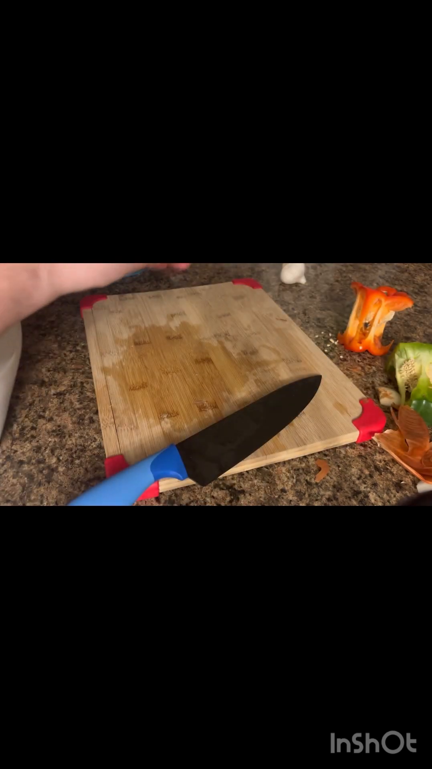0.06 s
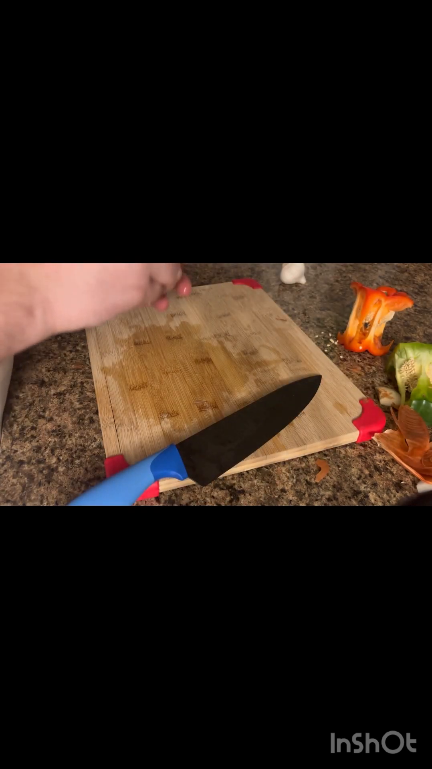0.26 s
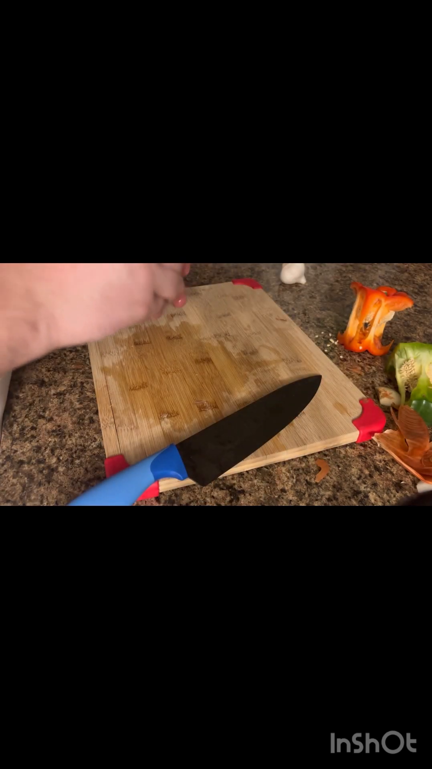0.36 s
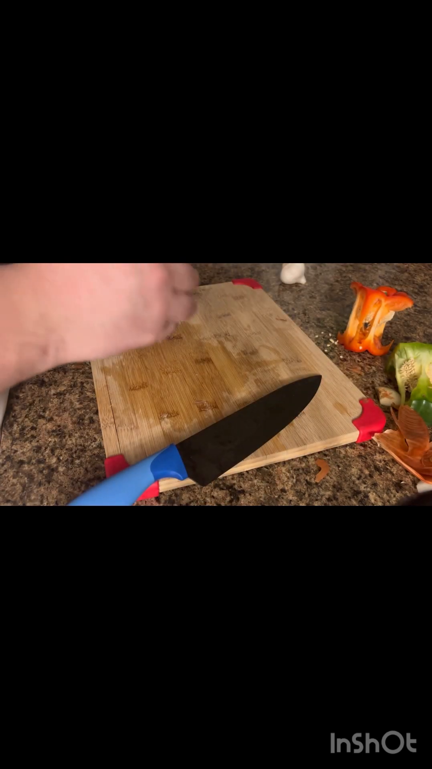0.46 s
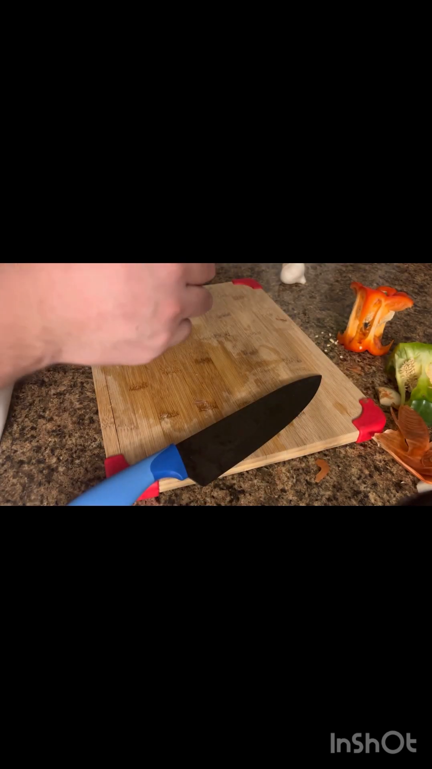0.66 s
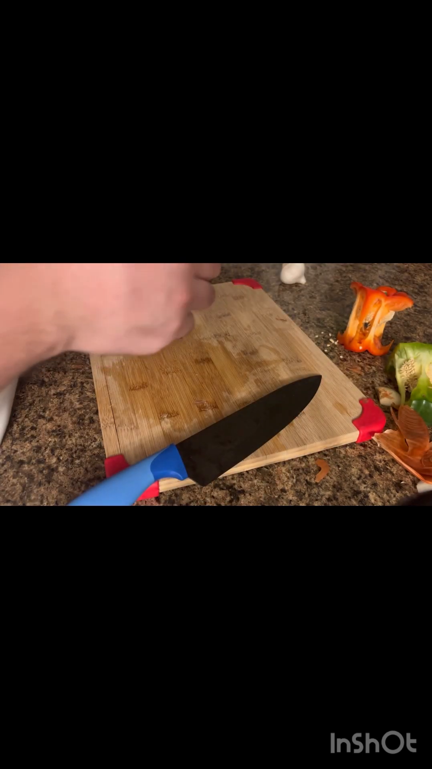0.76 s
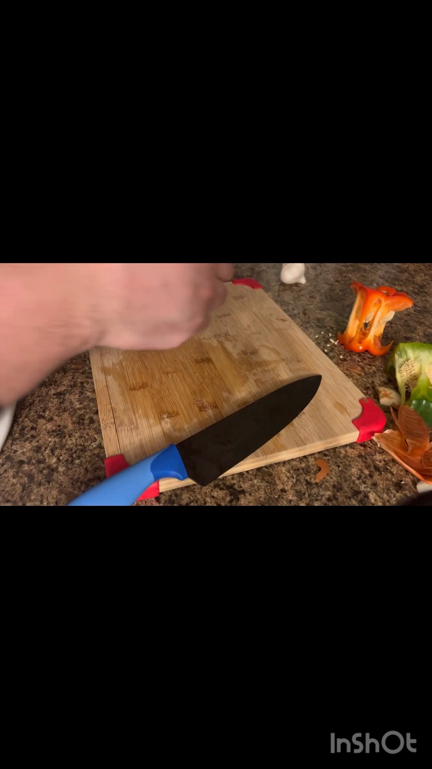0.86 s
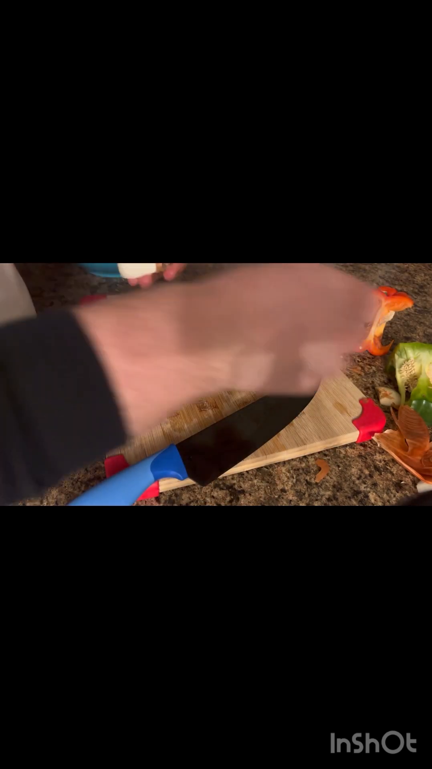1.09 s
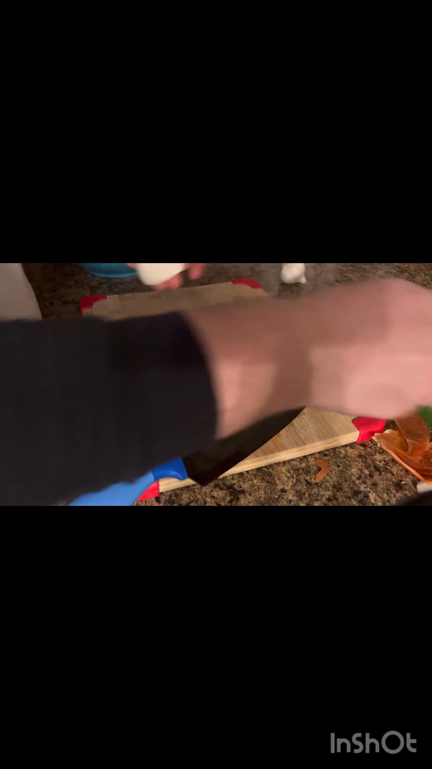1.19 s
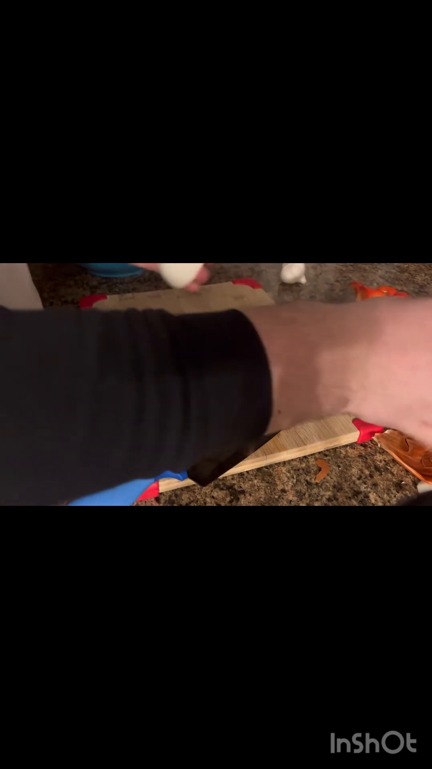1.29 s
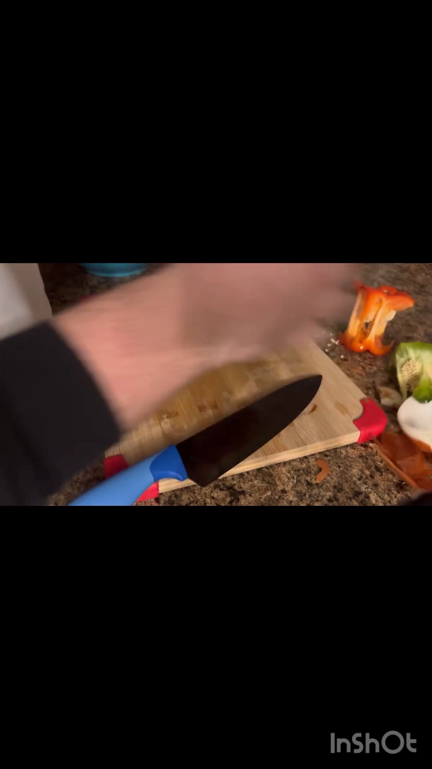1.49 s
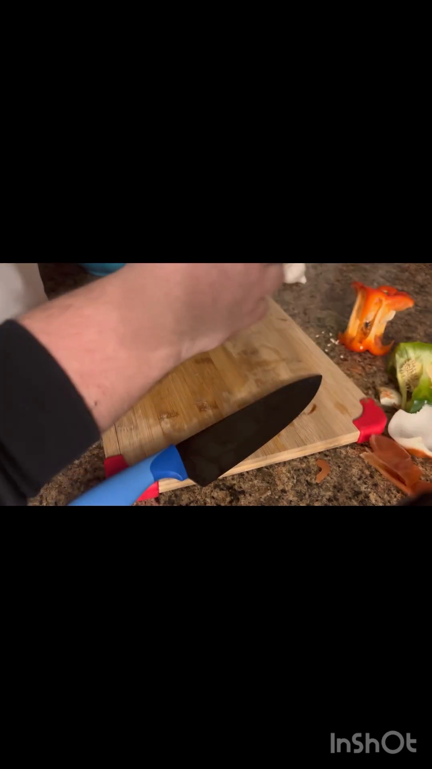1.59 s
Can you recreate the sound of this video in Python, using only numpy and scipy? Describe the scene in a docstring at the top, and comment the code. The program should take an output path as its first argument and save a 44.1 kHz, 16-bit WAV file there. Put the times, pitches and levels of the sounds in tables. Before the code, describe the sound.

Dry onion peel snaps in hands over a wooden board, with taps and a short bowl clatter near the start, a small rip midway, then low thuds; close stereo pickup, short room tail, faint hum.

```python
"""Dry onion skin crackles and tears as hands work it over a wooden cutting board in a small kitchen.
Sharp taps, then a hollow bump and a rattle, as of a bowl; soft knocks on the board; a low hum under all.
Skin is noise bursts and random grains; the bowl and knocks are decaying sines; taps are shaped clicks.
Reflections and a short tail follow, and two close microphone ports differ in phase and level."""
import sys
import numpy as np
from scipy import signal
from scipy.fft import rfft, irfft, next_fast_len
from scipy.io import wavfile

SR = 44100
rng = np.random.default_rng(int(sys.argv[2]) if len(sys.argv) > 2 else 0)


def unload_wav(signal):
    """Save mono or channel-first audio to the path in sys.argv[1] as 16-bit WAV at rate SR, clipped to [-1, 1]."""
    wavfile.write(
        sys.argv[1],
        SR,
        np.round(np.clip(np.atleast_2d(signal).T, -1, 1) * 32767).astype(np.int16),
    )


N = 72765
T = np.arange(N) / SR
SIZE = 2 * next_fast_len(N)  # padded transform length
HZ = np.fft.rfftfreq(SIZE, 1 / SR)
SAMPLES_PER_MS = SR / 1000


def amp(db):
    """Decibels to gain."""
    return 10 ** (np.asarray(db) / 20)


def unit(x):
    """Divide by the root of the mean square: rms 1 for real x."""
    return x / np.sqrt(np.mean(x ** 2) + 1e-20)


def along(points, hz=HZ):
    """Interpolate (Hz, value) points on a log frequency axis."""
    f, v = np.transpose(points)
    return np.interp(np.log(hz + 1), np.log(f + 1), v)


def filtered(x, response):
    """x through a frequency response."""
    return irfft(rfft(x, SIZE) * response, SIZE)[..., :N]


def colour(points):
    """Minimum-phase response shaped by (Hz, dB) points, then normalised by unit()."""
    cepstrum = irfft(np.log(amp(along(points))))
    cepstrum[1:SIZE // 2] *= 2
    cepstrum[SIZE // 2 + 1:] = 0
    return unit(np.exp(rfft(cepstrum)))


def decay(t, t60):
    """Exponential decay, 60 dB down at t60."""
    return np.exp(-np.log(1000) * t / t60)


def fade(start_s, t60):
    """Envelope that starts at start_s and decays."""
    return (T >= start_s) * decay(np.maximum(T - start_s, 0), t60)


def clicks(rows, t60, rough):
    """A sharp pulse trailed by a noise burst per (s, dB over 1 ms); rough is the burst's energy share."""
    out, t = np.zeros(N + SR), np.arange(SR // 20) / SR
    rough = np.clip(rough, 0, 1)
    for s, db in rows:
        burst = rng.standard_normal(len(t)) * decay(t, t60)
        burst *= np.sqrt(rough) / np.linalg.norm(burst)
        burst[0] = np.sqrt(1 - rough)
        out[round(s * SR):][:len(t)] += amp(db) * burst * np.sqrt(SAMPLES_PER_MS)
    return out[:N]


def grains(per_s, spread_db):
    """Tiny fractures at random moments, of random sign and uneven size, rms 1."""
    hits = rng.random(N) < per_s / SR
    signs = rng.choice([-1, 1], N)
    sizes = amp(spread_db * np.minimum(rng.exponential(size=N), 3))
    return unit(hits * signs * sizes)


def skin(snap_db=1, rustle_db=-1, flutter_t60_s=0.0029, split_hz=6500):
    """Single snaps, short rips and a fine crackle of fractures, all in the skin's papery colour."""
    # snaps: (time [s], rel. level [dB], treble over low band [dB])
    snap_rows = [(0.0579, -46, 1.5), (0.0834, -42.5, 18), (.105, -48, 20), (0.1186, -42.5, 0),
                 (0.126, -47, -11), (.1651, -46, 9), (.268, -57, 6), (0.2893, -34, 4), (.3134, -22.5, 7),
                 (.3201, -37, -16), (0.3311, -30.5, 17), (0.339, -34, 7), (.3765, -31, 0.5),
                 (0.4593, -50, -3), (.4781, -40, -1), (.5309, -49, 9), (0.5427, -38, 14), (.6528, -43, 16),
                 (0.6625, -44.5, 23), (.7303, -42.5, -1), (0.739, -40, 7), (.7416, -29, 18),
                 (0.7536, -31.5, 9), (.7743, -57, 4), (0.7893, -54, 13), (0.7962, -33.5, 18),
                 (0.8696, -38, 28), (0.8782, -41, 0), (.8875, -35, 1), (0.9041, -39.5, -2),
                 (0.9172, -37, 5), (.9702, -34.5, -10), (1.0898, -46, 10), (1.0974, -35.5, 10.5),
                 (1.1219, -44, 18), (1.127, -37.5, 26), (1.1633, -37, -4), (1.1787, -41, 2),
                 (1.1992, -47, 2), (1.2986, -42, 1), (1.3028, -40, 1), (1.3303, -40, -14),
                 (1.3473, -37.5, 1), (1.3788, -44, -18), (1.3962, -38, -3), (1.406, -42, -10.5)]
    # rips: (start [s], rel. level [dB], t60 [s])
    rip_rows = [(0.9522, -32.5, 0.035), (0.958, -27.5, .045), (.9645, -32.5, 0.022), (1.328, -42, .12)]
    # fine crackle: (time [s], rel. level [dB])
    rustle_levels = [(0, -70), (.05, -59.5), (.12, -55), (.25, -51.5), (.29, -45.5), (.38, -42), (.40, -64),
                     (.45, -55), (.53, -51.5), (.6, -70), (.66, -55), (.72, -61.5), (.76, -51),
                     (.85, -56.5), (.885, -44), (.94, -64), (1.06, -67), (1.15, -65), (1.175, -45),
                     (1.23, -66), (1.29, -85), (1.35, -64), (1.41, -50), (1.46, -62), (1.55, -56.5),
                     (1.6, -78)]
    # papery spectrum: (frequency [Hz], rel. level [dB])
    skin_colour = [(100, -9.5), (500, -12.5), (900, -4.5), (2000, -3.5), (3500, -2.5), (5500, -4.5),
                   (7500, 2), (9500, 1.5), (12500, -2.5), (14500, -2), (16000, -2.5)]

    # the tilt splits each snap's energy between two bands
    treble = 1 / (1 + (split_hz / np.maximum(HZ, 1)) ** 4)
    dull_rows = [(s, db - 10 * np.log10(1 + amp(2 * tilt))) for s, db, tilt in snap_rows]
    bright_rows = [(s, db - 10 * np.log10(1 + amp(-2 * tilt))) for s, db, tilt in snap_rows]
    dull = filtered(clicks(dull_rows, t60=0.013, rough=0.99), unit(1 - treble))
    bright = filtered(clicks(bright_rows, t60=0.007, rough=0.79), unit(treble))
    snaps = amp(snap_db) * (dull + bright)

    flake = rng.standard_normal(N) * fade(0, flutter_t60_s)
    fractures = grains(per_s=650, spread_db=4)
    crackle = unit(signal.fftconvolve(fractures, flake[:SR // 20])[:N])
    rustle = crackle * amp(rustle_db + np.interp(T, *np.transpose(rustle_levels)))

    rip_envelope = sum(amp(db) * fade(s, t60) for s, db, t60 in rip_rows)
    rips = grains(per_s=3000, spread_db=2.5) * rip_envelope
    return filtered(snaps + rustle + rips, colour(skin_colour))


def bowl(rattle_db=2, ring_t60_s=0.012, crack_db=-7, crack_t60_s=0.011, rise_s=0.00042):
    """Each hard contact rings briefly at its own pitch and in the bowl's high modes; rubbing fills the gaps."""
    # hard contacts: (time [s], rel. level [dB], main ring [Hz])
    rattle_rows = [(0.2851, -29, 1990), (0.293, -41.5, 2060), (.3035, -26.5, 2120), (0.307, -31, 2180),
                   (0.3104, -25.5, 2093), (.3195, -32, 2180), (.3321, -35.5, 2100), (.3483, -44, 2180),
                   (0.3589, -29.5, 2000), (.3657, -30.5, 2400), (0.371, -34, 2390), (.376, -36, 2300),
                   (.382, -50, 2480), (0.4174, -34, 2200), (.427, -37, 2360), (0.4338, -32.5, 2480),
                   (0.4408, -39, 2500), (0.446, -32, 2280), (.4868, -55, 2500), (0.4941, -40, 2550),
                   (0.5032, -35.5, 2500), (0.51, -48, 2430), (0.556, -41.5, 2350)]
    # high modes: (frequency [Hz], mean level re main ring [dB], t60 [s])
    high_modes = [(2920, -18, 0.0067), (3180, -13.5, 0.0069), (3900, -11, 0.0039), (4060, -10, 0.0064),
                  (4600, -30, 0.004), (7110, -5.5, 0.0083)]
    # rubbing on the bowl: (time [s], rel. level [dB])
    scrape_levels = [(.27, -73), (.305, -46), (.37, -44), (.40, -56.5), (.435, -46.5), (.5, -49.5),
                     (.58, -60.5), (.62, -94)]
    # rubbing spectrum: (frequency [Hz], rel. level [dB])
    rubbing_colour = [(300, 0.5), (1000, -32.5), (1550, -2), (1900, 4), (2450, -8.5), (2900, -4),
                      (3700, -8), (5000, -8), (8000, -10.5), (16000, -10.5)]

    out, t = np.zeros(N + SR), np.arange(SR // 20) / SR
    for s, db, hz in rattle_rows:
        ring = np.sin(2 * np.pi * hz * t) * decay(t, ring_t60_s)
        ring += amp(crack_db) * rng.standard_normal(len(t)) * decay(t, crack_t60_s)
        for mode_hz, level_db, t60 in high_modes:
            gain = amp(level_db + 2 * rng.standard_normal())
            ring += gain * np.sin(2 * np.pi * (mode_hz * t + rng.random())) * decay(t, t60)
        ring *= 1 - np.exp(-t / rise_s)
        ring /= np.linalg.norm(ring)
        out[round(s * SR):][:len(t)] += amp(db + rattle_db) * ring * np.sqrt(SAMPLES_PER_MS)
    rubbing = grains(per_s=700, spread_db=4.5) * amp(np.interp(T, *np.transpose(scrape_levels)))
    return out[:N] + filtered(rubbing, colour(rubbing_colour))


def bump(start_s=0.266, rise_s=0.008, level_db=-24.5):
    """A soft bump sets the bowl's low modes humming."""
    # low modes: (frequency [Hz], rel. level [dB], t60 [s])
    low_modes = [(150.9, -0.5, 0.34), (156.9, -1.5, 0.63), (221, -8.5, 0.41)]
    age = np.maximum(T - start_s, 0)
    hum = sum(amp(db) * fade(start_s, t60) * np.sin(2 * np.pi * hz * age) for hz, db, t60 in low_modes)
    return amp(level_db) * hum * (1 - np.exp(-age / rise_s))


def taps(wood_db=3, ring_db=-3, crack_db=-2):
    """Taps of onion and fingers: a dry crack and a brief ring, with a short wooden knock under them."""
    # taps: (time [s], rel. level [dB], knock offset before wood_db [dB])
    tap_rows = [(.198, -54, 5), (0.2005, -44.5, -4.5), (0.2062, -49, 2.5), (0.2151, -50, 6.5),
                (.225, -30.5, -34), (0.224, -30.5, -30), (.2267, -32, -16), (0.2307, -44, -9),
                (0.2342, -40.5, -7.5), (0.2478, -60, 7), (.253, -55.5, 2), (0.257, -46.5, 9.5),
                (0.264, -52.5, 15), (.359, -45, 1), (0.4873, -41, -1), (1.6275, -53, 7)]
    # ring of a hard tap: (frequency [Hz], rel. level [dB], t60 [s])
    ring_modes = [(2368, -4.5, 0.0084), (2690, -6, 0.0067), (3400, 5, 0.0062)]
    # crack spectrum: (frequency [Hz], rel. level [dB])
    crack_colour = [(100, -40), (700, -30), (1500, -3.5), (2500, 3.5), (3700, 16), (4600, 7), (7500, 10),
                    (10500, -2), (13500, 5.5), (16000, -9.5)]
    # wooden knock spectrum: (frequency [Hz], rel. level [dB])
    wood_colour = [(60, -3.5), (200, -0.5), (300, -2), (480, -7), (750, -4.5), (1100, -20.5), (3000, -36.5),
                   (16000, -70)]

    crack = clicks([(s, db) for s, db, low_db in tap_rows], t60=0.008, rough=0.6)
    knock = clicks([(s, db + low_db) for s, db, low_db in tap_rows], t60=0.025, rough=0.6)
    ring = sum(amp(db) * fade(0, t60) * np.sin(2 * np.pi * hz * T) for hz, db, t60 in ring_modes)
    body = amp(crack_db) * colour(crack_colour) + amp(ring_db) * unit(rfft(ring, SIZE))
    return filtered(crack, body) + amp(wood_db) * filtered(knock, colour(wood_colour))


def board(rise_s=0.0046, sag_share=1.76, sag_s=0.0052):
    """Soft knocks start sag_share above their final pitch and sink as the contact relaxes."""
    # knocks: (time [s], level [dB], final pitch [Hz], t60 [s])
    knock_rows = [(0.272, -24.5, 63, 0.12), (0.682, -35.5, 88.7, 0.36), (1.3032, -17, 97, 0.06),
                  (1.346, -25.5, 98, 0.055), (1.55, -39, 114, 0.33)]
    out = np.zeros(N)
    for s, db, hz, t60 in knock_rows:
        age = np.maximum(T - s, 0)
        turns = hz * (age + sag_share * sag_s * (1 - np.exp(-age / sag_s)))
        rise = 1 - np.exp(-(age / rise_s) ** 2)
        out -= amp(db) * fade(s, t60) * rise * np.sin(2 * np.pi * turns)
    return out


def counter(x, t60_s=0.015):
    """Early reflections from board, counter and hands: decaying noise, independent at each port."""
    echoes = (rng.standard_normal((2, N)) * fade(0.00075, t60_s))[:, :SR // 10]
    return signal.fftconvolve(x[None], echoes / np.linalg.norm(echoes[0]), axes=1)[:, :N]


def kitchen(x, apart=0.4):
    """The room's tail: noise decaying by frequency, mostly shared; apart is the gain of each port's own part."""
    # room decay: (frequency [Hz], t60 [s])
    room_t60 = [(150, 0.9), (1000, 0.29), (4000, 0.31), (14000, 0.27)]
    hz, t, spectra = signal.stft(rng.standard_normal((3, SR // 2)), SR, nperseg=256)
    parts = signal.istft(spectra * decay(t, along(room_t60, hz)[:, None]), SR, nperseg=256)[1]
    tail = parts[0] + apart * parts[1:]
    tail = np.pad(tail / np.linalg.norm(tail[0]), ((0, 0), (SR // 300, 0)))  # delayed by 1/300 s
    return signal.fftconvolve(x[None], tail, axes=1)[:, :N]


def background(air_db=-47.5, hum_hz=59.43, hum_db=-53):
    """Room air as partly correlated stereo noise, and an appliance's hum as a steady sine."""
    # air spectrum: (frequency [Hz], rel. level [dB])
    air_colour = [(25, -25), (45, -13.5), (65, -5), (110, -0.5), (160, -17), (220, -5.5), (320, -14.5),
                  (550, -12), (900, -17.5), (2000, -22.5), (4000, -30.5), (7000, -44), (10000, -83.5),
                  (16000, -52)]
    # left-right likeness of the air: (frequency [Hz], correlation [-1..1])
    air_alike = [(100, 0.99), (250, 0.77), (600, -0.4), (1300, -0.4), (2800, 0.38), (7000, -0.25)]
    turn = np.arccos(np.clip(along(air_alike), -1, 1)) / 2
    mid_side = amp(along(air_colour)) * np.array([np.cos(turn), np.sin(turn)])
    mid, side = filtered(rng.standard_normal((2, N)), mid_side)
    air = unit(np.array([mid + side, mid - side]))
    hum = unit(np.sin(2 * np.pi * hum_hz * T))
    return amp(air_db) * air + amp(hum_db) * hum


def scene(room_db=-8, early_db=-11, thud_room_db=-22):
    """All sources with reflections, reaching the ports with a difference of phase and level."""
    # port phase: (frequency [Hz], left lead [rad])
    port_phase = [(100, 0), (1100, .6), (1550, 1.8), (1850, .3), (2700, 1.2), (3900, .4), (4700, .3),
                  (6400, -1.3), (7500, -2.3), (8100, -3), (9000, -3.3), (9700, -4.1), (11000, -6),
                  (13300, -6.5), (14200, -7.6), (15000, -8.9), (15800, -9.4)]
    # port level: (frequency [Hz], left over right [dB]); the background gets half
    port_tilt = [(150, 0), (500, 6.5), (1400, 0), (2400, 3.5), (4000, 9.5), (7000, 0.5), (10000, 1)]

    crisp = skin() + bowl() + taps()
    thuds = board() + bump()
    early = amp(early_db) * counter(crisp)
    room = kitchen(amp(room_db) * crisp + amp(thud_room_db) * thuds)
    sound = crisp + thuds + early + room

    sides = np.array([[.5], [-.5]])  # left, right
    tilt_db = sides * along(port_tilt)
    ports = amp(tilt_db) * np.exp(1j * sides * along(port_phase))
    return filtered(sound, ports) + filtered(background(), amp(tilt_db / 2))


def record(dry, top_hz=15850):
    """Steep low-pass, gain one half at top_hz."""
    return filtered(dry, 1 / (1 + (HZ / top_hz) ** 120))


dry = scene()
out = record(dry)
unload_wav(out)
```